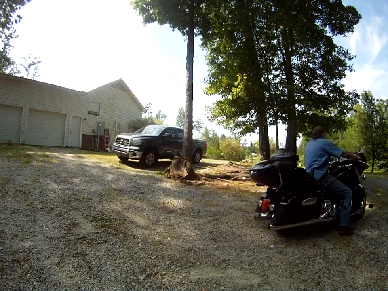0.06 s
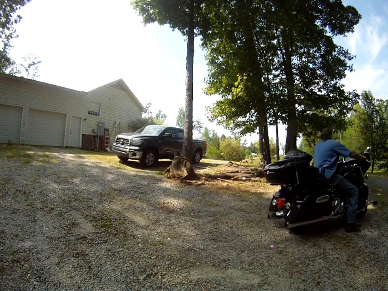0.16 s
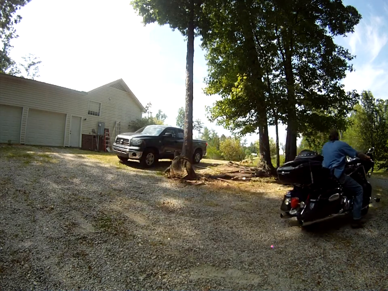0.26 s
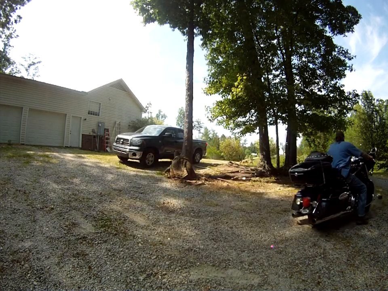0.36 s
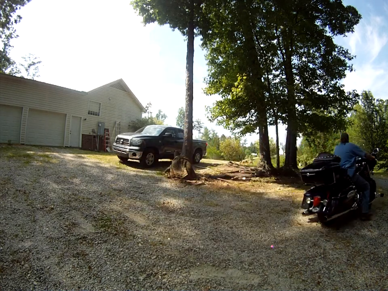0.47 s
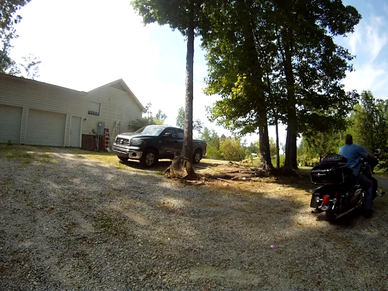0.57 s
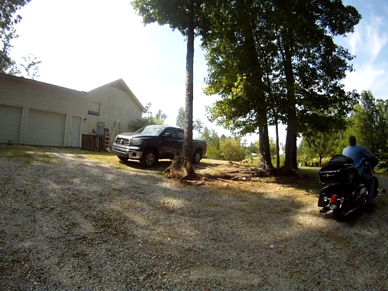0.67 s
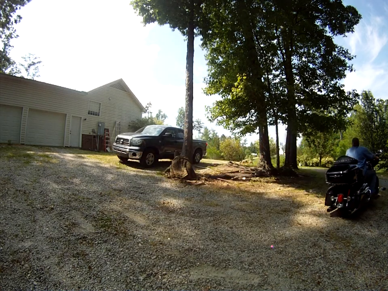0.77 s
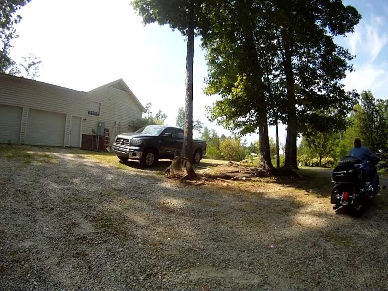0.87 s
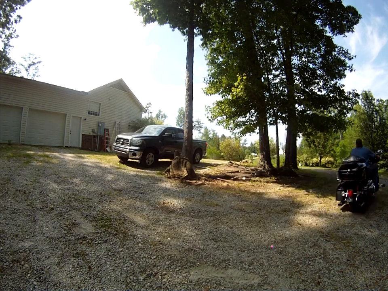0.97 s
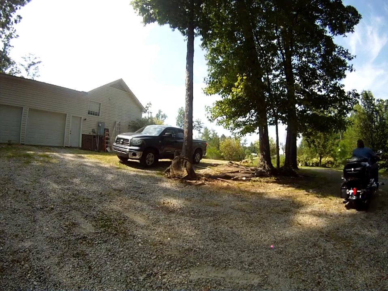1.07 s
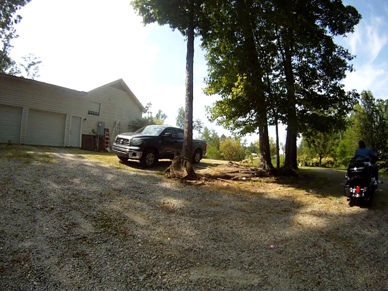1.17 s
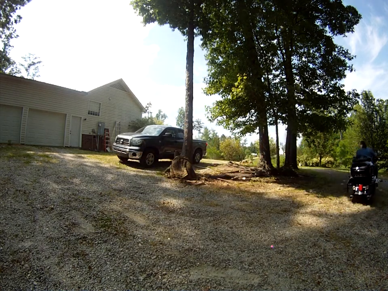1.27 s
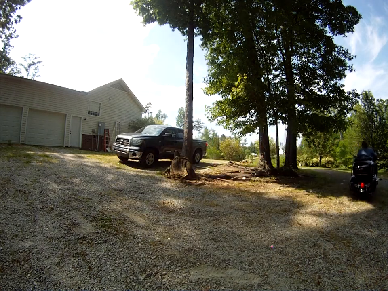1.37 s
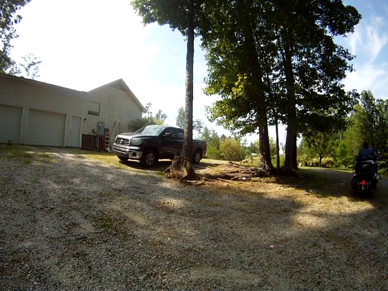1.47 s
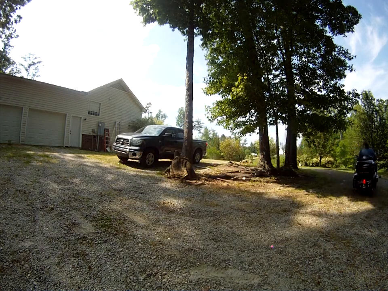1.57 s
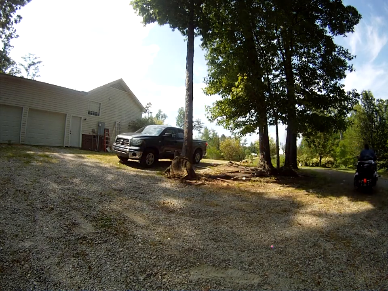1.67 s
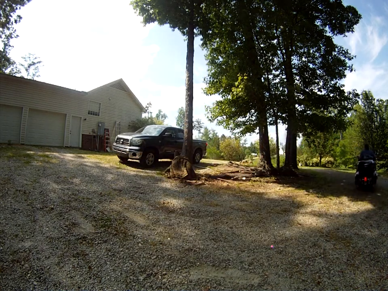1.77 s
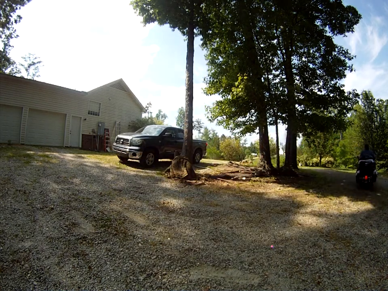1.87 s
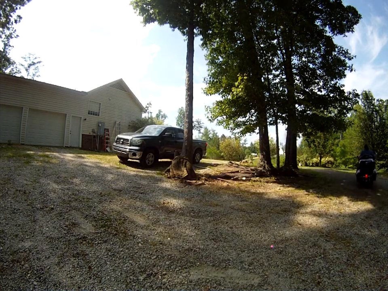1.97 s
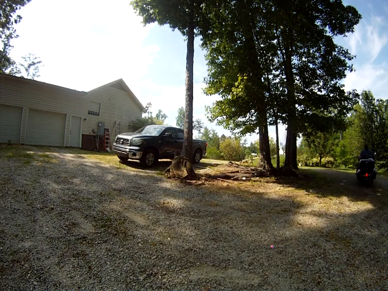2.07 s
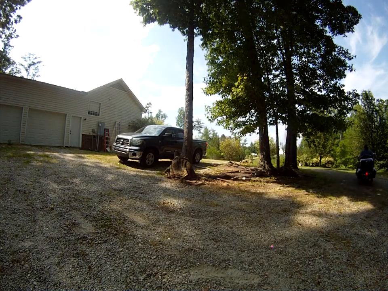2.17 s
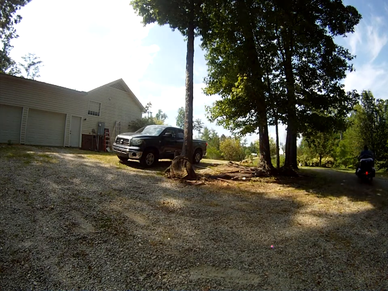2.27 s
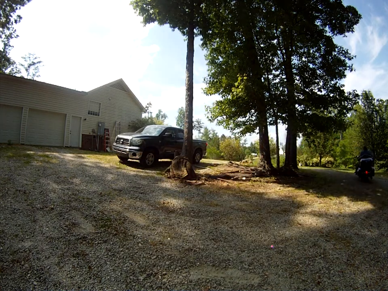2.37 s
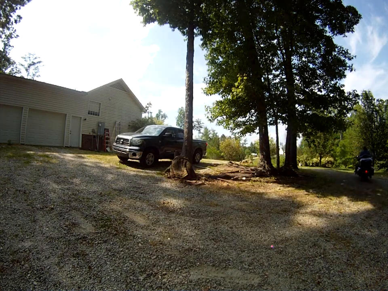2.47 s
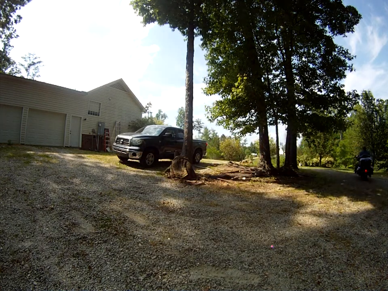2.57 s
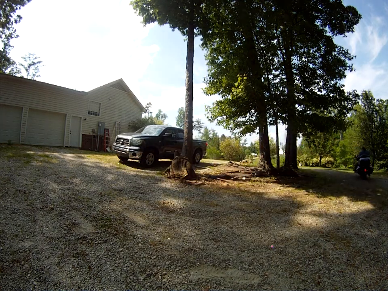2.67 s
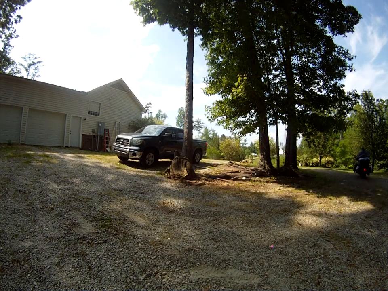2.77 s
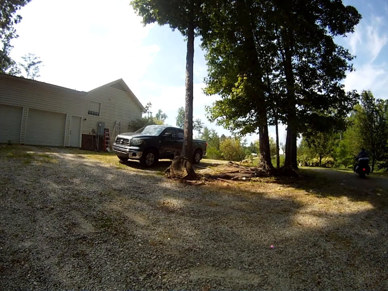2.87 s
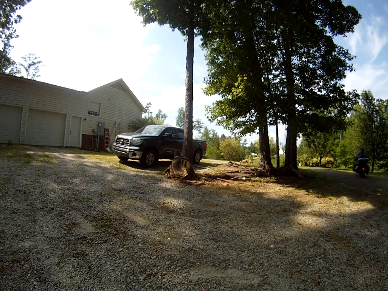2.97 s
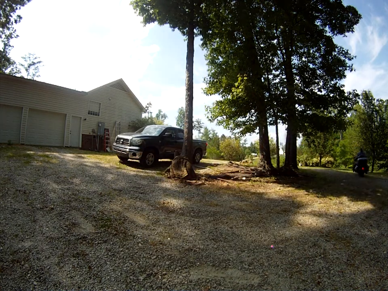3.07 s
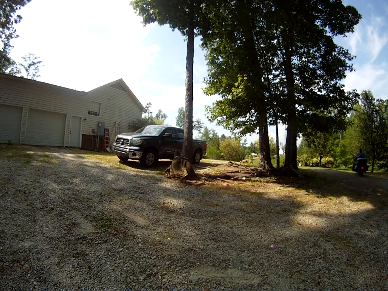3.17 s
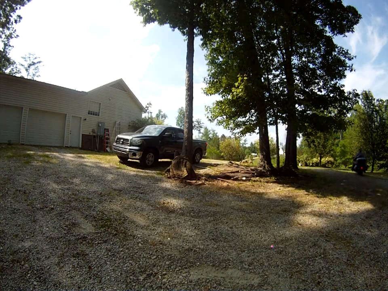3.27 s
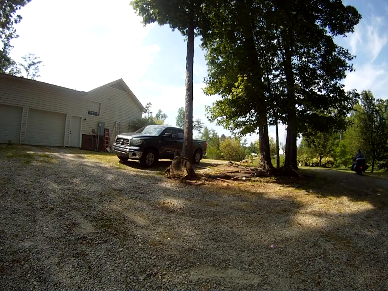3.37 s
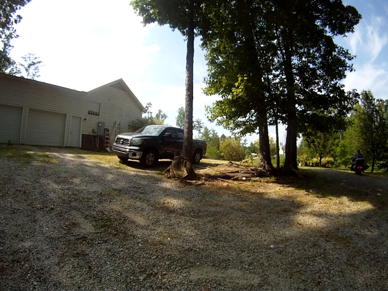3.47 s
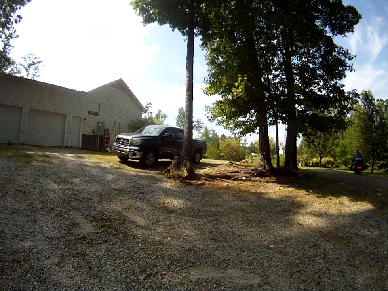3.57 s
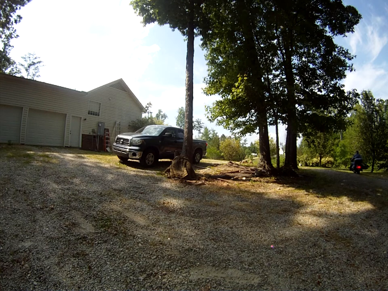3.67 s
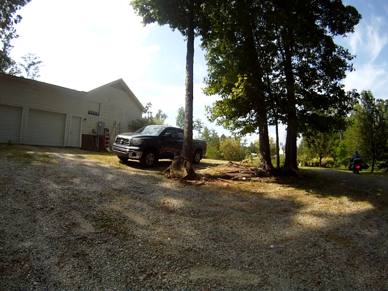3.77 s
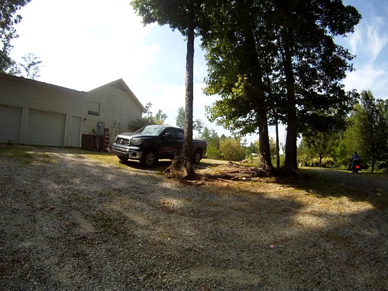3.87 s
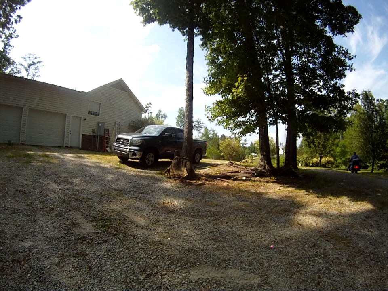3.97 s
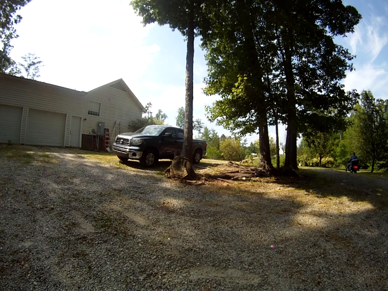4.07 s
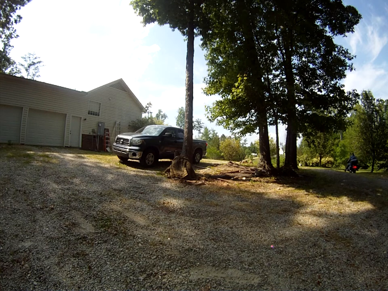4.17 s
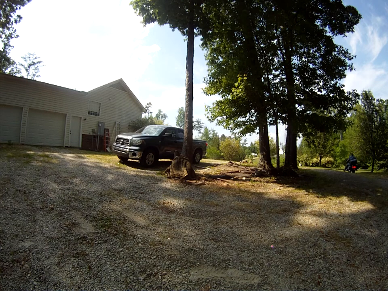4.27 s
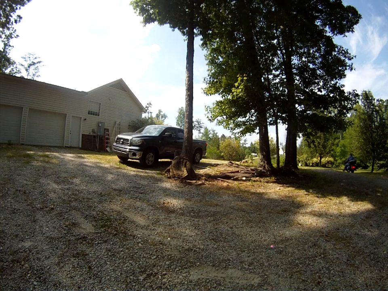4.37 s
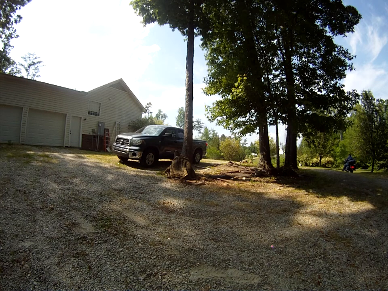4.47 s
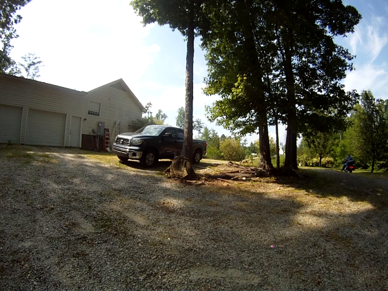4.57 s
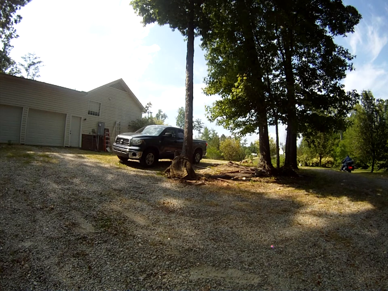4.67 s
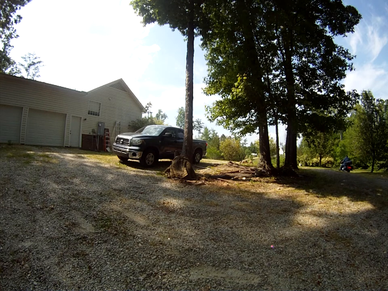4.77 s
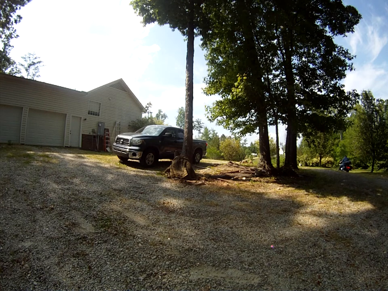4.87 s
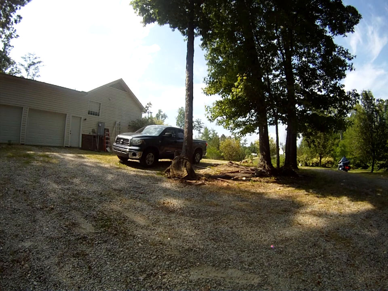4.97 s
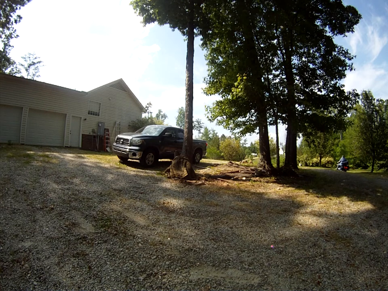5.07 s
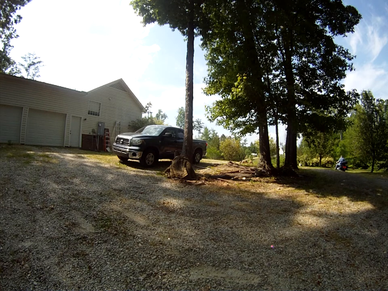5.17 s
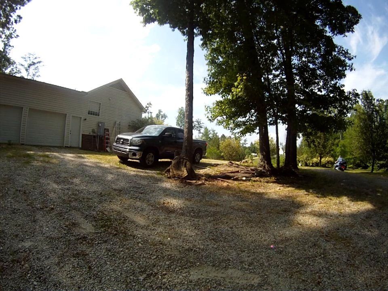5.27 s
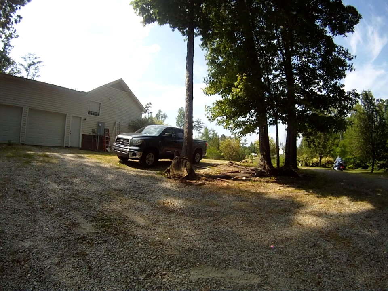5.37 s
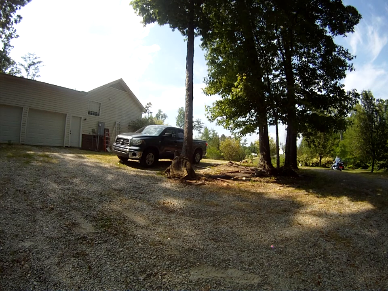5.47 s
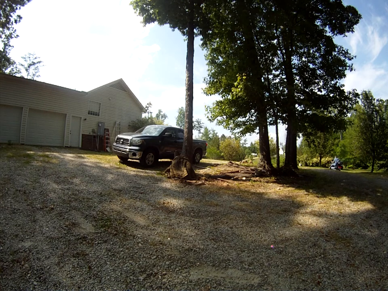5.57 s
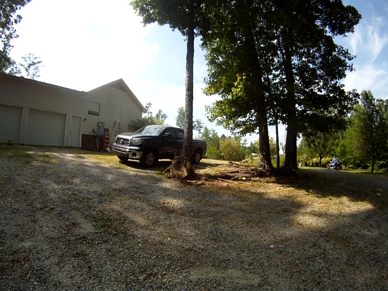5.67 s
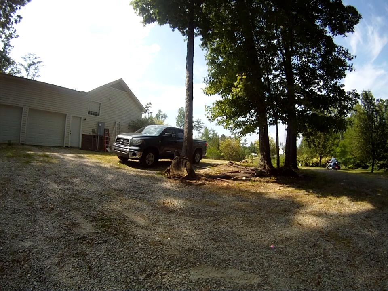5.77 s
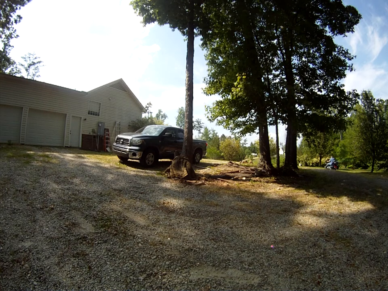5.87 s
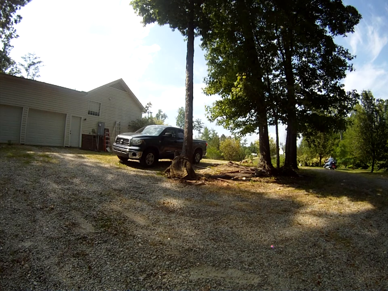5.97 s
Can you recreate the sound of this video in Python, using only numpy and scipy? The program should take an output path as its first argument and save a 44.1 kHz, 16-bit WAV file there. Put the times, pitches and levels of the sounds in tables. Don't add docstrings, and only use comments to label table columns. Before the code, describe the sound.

Outdoors beside a garage, a heavy four-cylinder motorcycle leaves in a burst of deep pulsing exhaust, gear whine and scattering gravel. The engine drops, picks up again, lifts off and settles into a lumpy distant throb. Stone clicks thin out as it recedes, with short reflections from the wall and trees. Four soft rising bird notes come last over faint air, through a low-fidelity camera microphone with coarse, limited treble.

```python
import sys
import numpy as np
from scipy import signal
from scipy.fft import rfft, irfft, next_fast_len
from scipy.io import wavfile
from scipy.ndimage import uniform_filter1d, map_coordinates

SR = 44100
rng = np.random.default_rng(int(sys.argv[2]) if len(sys.argv) > 2 else 0)


def file_out(sig):
    cols = np.atleast_2d(sig).T
    lim = np.clip(cols, -1, 1)
    pcm = np.round(lim * 32767).astype(np.int16)
    wavfile.write(sys.argv[1], SR, pcm)


def invert_db(level):
    return 10 ** (np.asarray(level, dtype=float) / 20)


N = 265923
TIME = np.arange(N) / SR


def unit(x):
    return x / np.sqrt(np.mean(x ** 2) + 1e-20)


def curves(rows):
    seconds, *columns = np.transpose(rows)
    return [np.interp(TIME, seconds, column) for column in columns]


def filtered(x, response):
    size = next_fast_len(N + SR // 2)
    spectrum = rfft(x, size) * response(np.fft.rfftfreq(size, 1 / SR))
    return irfft(spectrum, size)[..., :N]


def coloured(x, points):
    point_hz, db = np.transpose(points)
    return filtered(x, lambda hz: invert_db(np.interp(np.log(hz + 1), np.log(point_hz + 1), db)))


def wobble(rate):
    knots = rng.standard_normal(int(N * rate / SR) + 4)
    return map_coordinates(knots, [np.arange(N) * rate / SR])


def steady(x, seconds):
    return x / np.sqrt(abs(uniform_filter1d(x ** 2, int(seconds * SR))) + 1e-12)


def swell(centre_s, half_s):
    return np.exp(-((TIME - centre_s) / half_s) ** 2)


def resonant(x, modes, stretch=1):
    def response(f):
        f_cool = f / stretch
        total = 0
        for k, (hz, width, db) in enumerate(modes):
            peak = 1j * f_cool * width / (hz * hz - f_cool * f_cool + 1j * f_cool * width)
            total = total + (-1) ** k * invert_db(db) * peak
        return total
    return filtered(x, response)


START_M, SPEED_M_S = 2.99, 4.6


def distance():
    ridden_m = SPEED_M_S * np.arange(N) / SR
    return ridden_m, -20 * np.log10(1 + ridden_m / START_M)


# (time [s], four-stroke cycles [1/s])
ENGINE_SPEED = [(0, 13.78), (.16, 13.1), (.38, 7.97), (.64, 8.01), (.89, 10.36), (1.03, 10.86),
                (1.2, 10.88), (1.66, 11.89), (2.07, 8.27), (2.4, 10.64), (2.7, 9.29), (3.2, 8.51),
                (3.48, 9.32), (4.2, 9.6), (4.77, 10.15), (5.01, 9.87), (5.51, 10.08), (6.03, 10.89)]


def crank():
    cycles_at_start = .248
    return cycles_at_start + np.cumsum(curves(ENGINE_SPEED)[0]) / SR


# (time [s], strength of the firings [dB], open throttle [0-1])
RIDER_HAND = [(0, -0.5, 0.95), (.08, -1.5, 0.35), (.22, -3, 0), (.4, -2.5, .1), (.5, -5.5, 0.04),
              (.9, 3, 0.18), (1.25, 5.5, 0.52), (1.68, 3.5, 0.76), (1.82, 1, 0.2), (2.02, -5, 0.13),
              (2.35, 2, 0.36), (2.75, 1, 0.04), (3.15, -0.5, 0), (4.25, -2, 0), (4.48, 1, 0.05),
              (4.68, -2.5, 0), (5.2, -0.5, 0), (6.03, -1, 0.22)]


def rider_effort():
    effort_db, load = curves(RIDER_HAND)
    return effort_db, np.clip(load, 0, 1)


FIRING_ORDER = [0, .241, .612, .75]
FROM_THE_SIDE = [-5, -5, -4]
FROM_BEHIND = [-2.5, -6, -5]
# (time [s], half length [s], share [0-1])
THROTTLE_LIFTS = [
    (.15, .25, .5),
    (1.95, .22, .9),
    (2.6, .45, .35),
    (4.7, .2, .9),
]
TURN_S, TURN_LENGTH_S = 3.2, .5
SCATTER_DB, LEAN_SCATTER_DB, LEAN_DB = 1.2, 1.6, -2
MISFIRE_S, MISFIRE_DB = .45, -11


def firings():
    lean = np.clip(sum(share * swell(s, half) for s, half, share in THROTTLE_LIFTS), 0, 1)
    behind = .5 + .5 * np.tanh((TIME - TURN_S) / TURN_LENGTH_S)
    cylinders_db = [np.zeros(N)]
    for side, back in zip(FROM_THE_SIDE, FROM_BEHIND):
        heading_db = side + (back - side) * behind
        cylinders_db.append((1 - lean) * heading_db + lean * LEAN_DB)
    cylinders_db[1] = cylinders_db[1] + MISFIRE_DB * swell(MISFIRE_S, .04)
    scatter_db = SCATTER_DB + LEAN_SCATTER_DB * lean
    turned, pipes = crank(), np.zeros((2, N))
    for k, (share, heard_db) in enumerate(zip(FIRING_ORDER, cylinders_db)):
        cycle = np.arange(70) + share
        cycle = cycle[(cycle > turned[0] - .02) & (cycle < turned[-1])]
        at = np.searchsorted(turned, cycle)
        size_luck, time_luck = rng.standard_normal((70, 2))[:len(at)].T
        late = (.0004 * SR * scatter_db[at] * time_luck).astype(int)
        pipes[k // 2][np.clip(at + late, 0, N - 1)] += invert_db(heard_db[at] + scatter_db[at] * size_luck)
    return pipes


# (frequency [Hz], width [Hz], level [dB])
NEAR_SILENCER = [(40, 40, -14), (77, 20, 0), (117, 15, 2), (150, 45, -16)]
# (frequency [Hz], width [Hz], level [dB])
DULL_SILENCER = [(40, 40, -17), (80, 11, 3.5), (115, 18, -7), (150, 45, -22)]


def thump(blows, load):
    ringing = np.zeros(N)
    for blow, modes in zip(blows, (NEAR_SILENCER, DULL_SILENCER)):
        ringing += resonant((1 - load) * blow, modes) + resonant(load * blow, modes, 1.13)
    return steady(ringing, 0.18)


# (frequency [Hz], width [Hz], level [dB])
HEADER_PIPE = [(224, 92, 0), (348, 108, -2.5), (464, 84, 1), (608, 37, 0.5)]
# (frequency [Hz], level [dB per Hz])
GAS_TONE = [(60, -58), (130, 6.5), (200, 2), (300, -1), (500, -13.5), (680, -18.5), (1100, -20.5),
            (2000, -32.5), (5000, -25)]


def bark(train, blows, load):
    crack = steady(resonant(sum(blows), HEADER_PIPE), 0.45)
    t = np.arange(SR // 10) / SR
    puffs = signal.fftconvolve(sum(train), t / .004 * np.exp(-t / 0.01))[:N]
    gas = (steady(puffs, 0.15) + 4.6) * rng.standard_normal(N)
    rush = steady(coloured(gas, GAS_TONE), 0.21)
    return steady(rush + (.25 + 1.1 * load) * crack, .3)


THUMP_DB, BARK_DB = -17, -28.5
BARK_FOLLOWS, BARK_LOAD_DB = 0.43, 4.5


def exhaust():
    effort_db, load = rider_effort()
    far_db = distance()[1]
    thump_db = THUMP_DB + far_db + effort_db
    bark_db = BARK_DB + far_db + BARK_FOLLOWS * effort_db + BARK_LOAD_DB * load
    train = firings()
    blows = filtered(train, lambda f: 1 / (1 + 1j * f / 300) ** 2)
    deep = invert_db(thump_db - 1.63) * thump(blows, load)
    return deep + invert_db(bark_db - 0.94) * bark(train, blows, load)


# (frequency [Hz], level [dB per Hz])
CRUNCH_TONE = [(200, -8), (500, 6.5), (900, 0.5), (1400, -4.5), (2100, -4), (2800, -5.5), (5000, -11.5),
               (9000, -15)]
GRAVEL_DB, GRAVEL_FOLLOWS, SHADE_DB_PER_M = -36, 0.67, 0.03
SPIN_DB, SPIN_S = 5, 0.36


def gravel():
    ridden_m, far_db = distance()
    gravel_db = GRAVEL_DB + far_db - SHADE_DB_PER_M * ridden_m
    gravel_db = gravel_db + GRAVEL_FOLLOWS * rider_effort()[0] + SPIN_DB * swell(0, SPIN_S)
    size_db = np.minimum(3 * rng.exponential(size=N), 13)
    grains = rng.standard_normal(N) * invert_db(size_db) * (rng.random(N) < .06)
    shake_db = 1.3 * np.cos(2 * np.pi * (crank() - .05))
    clumps = invert_db(.7 * wobble(10) + 1.3 * wobble(45) + shake_db)
    grinding = clumps * (unit(grains) + 1.17 * rng.standard_normal(N))
    return invert_db(gravel_db) * steady(coloured(grinding, CRUNCH_TONE), 0.2)


# (time [s], half length [s], first harmonic level [dB], second harmonic level [dB])
GEAR_WHINES = [
    (.09, .13, -43, -58),
    (.52, .16, -55, -52),
    (.97, .22, -53, -49),
    (1.64, .05, -68, -54),
    (2.5, .35, -63, -60),
    (5.85, .2, -64, -78),
]
TEETH, MESH_DB = 99, -54


def gears():
    turned = crank()
    ripple = 1.2 * np.sin(4 * np.pi * turned)
    phase = 2 * np.pi * TEETH * turned + ripple + wobble(70) + wobble(15)
    flutter_db = 4.5 * np.array([wobble(45), wobble(45)]) - 2
    mesh = invert_db(MESH_DB + distance()[1])
    whine = np.zeros(N)
    for k in range(2):
        size = mesh + sum(invert_db(db[k]) * swell(s, half) for s, half, *db in GEAR_WHINES)
        whine += size * invert_db(flutter_db[k]) * np.sin((k + 1) * phase)
    return whine


# (time [s], peak level [dB], pitch [Hz], time to fall 60 dB [s], treble level [dB])
THROWN_STONES = [(0.027, -21, 1137, 0.057, 2.5), (0.199, -27.5, 1170, 0.081, -3),
                 (0.292, -23.5, 940, 0.043, -11), (0.412, -28.5, 1750, 0.068, -9),
                 (0.766, -31, 773, 0.071, -20), (0.871, -26, 738, 0.038, -11), (0.959, -37, 781, 0.048, -2),
                 (1.163, -32, 790, 0.048, -2), (1.521, -36, 1200, 0.043, 3.5),
                 (1.662, -30.5, 813, 0.046, -4), (1.682, -33, 993, 0.034, -3),
                 (1.941, -38, 740, 0.041, 4.5), (2.904, -35.5, 703, 0.031, -5),
                 (3.032, -40, 789, 0.033, -2), (3.195, -33.5, 1140, 0.03, -22),
                 (3.264, -34.5, 748, 0.043, -21), (3.625, -35.5, 720, 0.035, -20),
                 (4.44, -54, 703, 0.04, -17), (4.493, -35.5, 740, 0.054, -16),
                 (4.539, -39.5, 740, 0.036, -21), (4.748, -40, 750, 0.034, -24)]


def stones():
    out, t = np.zeros(N + SR), np.arange(SR // 8) / SR
    bright = signal.butter(1, [2200, 5400], "band", fs=SR)
    for s, db, hz, t60, treble_db in THROWN_STONES:
        dull = signal.butter(2, [hz * .5, hz * 1.43], "band", fs=SR)
        body = unit(signal.lfilter(*dull, rng.standard_normal(len(t))))
        edge = unit(signal.lfilter(*bright, rng.standard_normal(len(t))))
        attack = 1 - np.exp(-t / 0.0011)
        fall = invert_db(db - 4.5 - 60 * t / max(t60, .005)) * attack
        out[round(s * SR):][:len(t)] += fall * (body + invert_db(treble_db) * edge)
    return out[:N]


# (frequency [Hz], level [dB per Hz])
AIR_TONE = [(20, -25), (60, -28), (300, -7.5), (800, -17.5), (1500, -38), (5000, -22), (9000, -28)]


def quiet_air():
    return invert_db(-57.0) * unit(coloured(rng.standard_normal(N), AIR_TONE))


def yard(x):
    t = np.arange(SR // 2) / SR
    tail = rng.standard_normal(len(t)) * invert_db(-60 * t / .5) * (t > .02)
    return signal.fftconvolve(x, tail / np.linalg.norm(tail))[:N]


# (time [s], length [s], first pitch [Hz], last pitch [Hz], level [dB])
BIRD_NOTES = [
    (5.59, .045, 2050, 2750, -64),
    (5.685, .058, 2020, 3050, -61),
    (5.808, .045, 2040, 2900, -59.5),
    (5.912, .045, 2020, 2750, -61),
]


def bird():
    out = np.zeros(N + SR)
    for s, length, first_hz, last_hz, db in BIRD_NOTES:
        u = np.linspace(0, 1, int(length * SR))
        hz = first_hz + (last_hz - first_hz) * u ** 4 * (5 - 4 * u)
        whistle = np.sin(2 * np.pi * np.cumsum(hz) / SR)
        out[round(s * SR):][:len(u)] += invert_db(db + 1.0) * np.sin(np.pi * u) ** 0.45 * whistle
    return out[:N]


def scene():
    near = exhaust() + gears() + stones() + bird()
    echo = invert_db(-8.5) * yard(near)
    return (near + echo + gravel() + quiet_air())[None]


# (frequency [Hz], level [dB])
MIC_TONE = [(18, -38), (32, 3.5), (70, 2.5), (4900, 0.5), (5250, -3.5), (5600, -6), (5850, -9.5),
            (6000, -15), (6100, -85)]


def camera(sound):
    slow = signal.resample_poly(coloured(sound, MIC_TONE), 40, 147, axis=1)
    held = np.repeat(slow, 4, axis=1)
    return signal.resample_poly(held, 147, 160, axis=1)[:, :N]


def low_pass(x):
    return signal.sosfilt(signal.butter(12, 15780, fs=SR, output="sos"), x)


def record(dry):
    mix = camera(dry)
    return low_pass(mix)


dry = scene()
out = record(dry)
file_out(out)
```